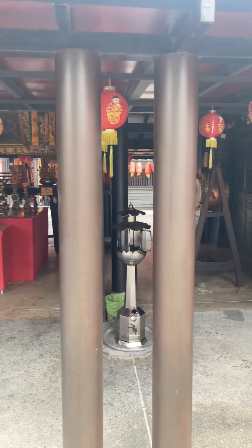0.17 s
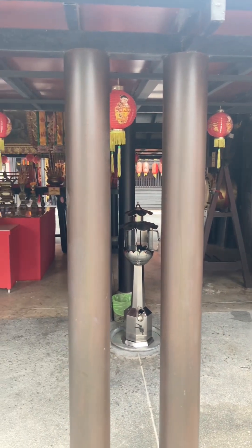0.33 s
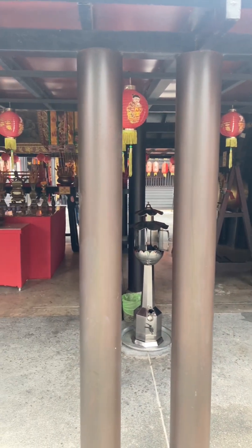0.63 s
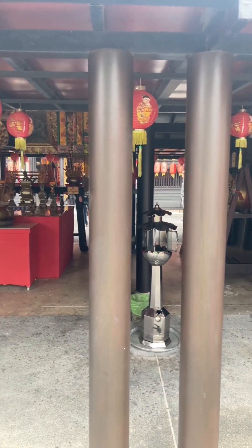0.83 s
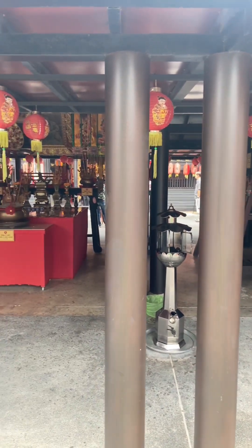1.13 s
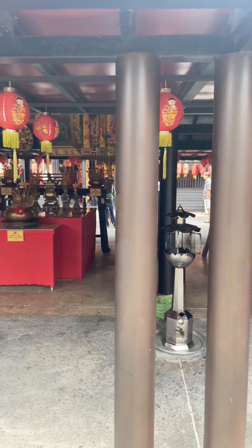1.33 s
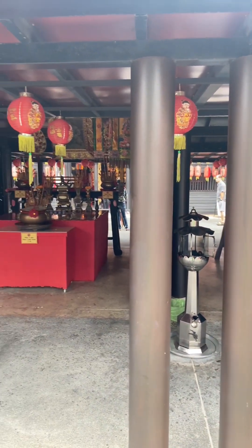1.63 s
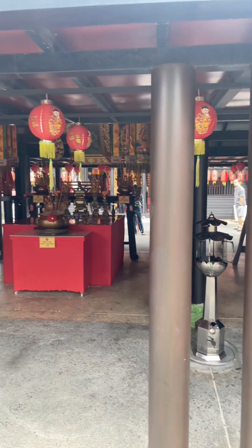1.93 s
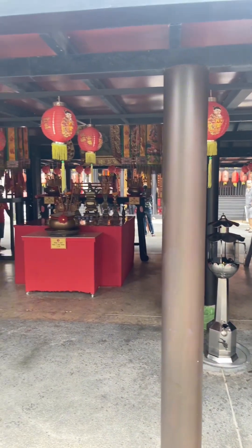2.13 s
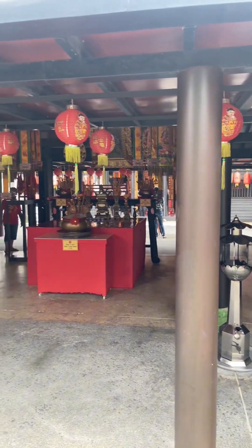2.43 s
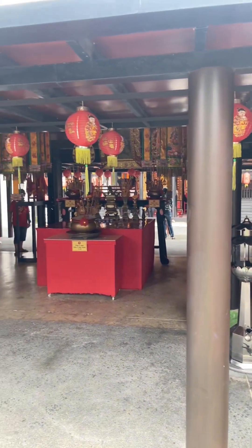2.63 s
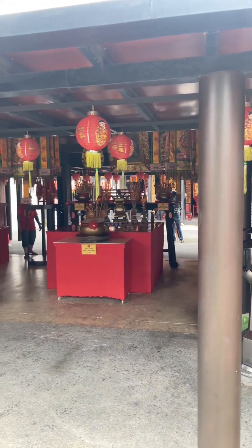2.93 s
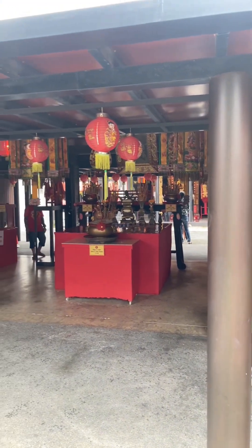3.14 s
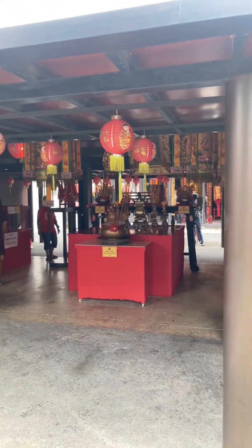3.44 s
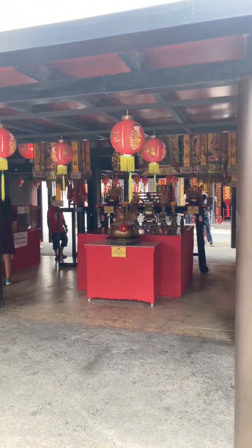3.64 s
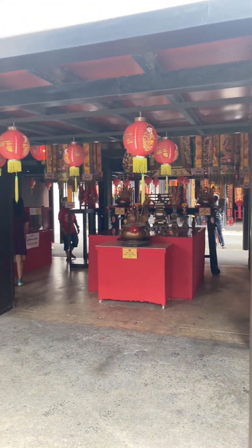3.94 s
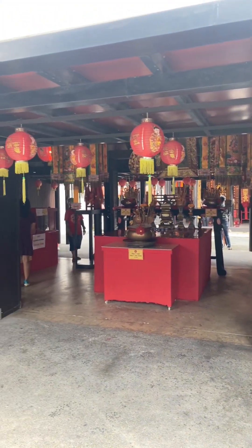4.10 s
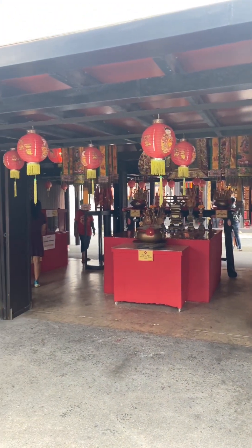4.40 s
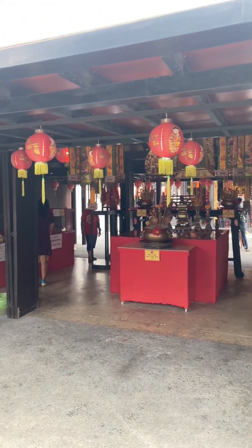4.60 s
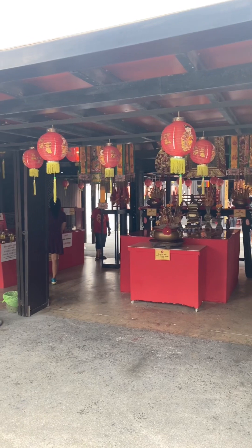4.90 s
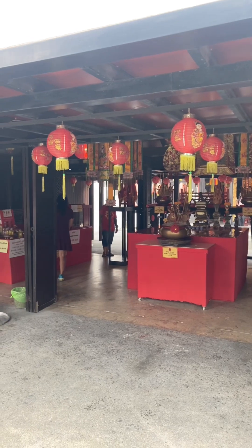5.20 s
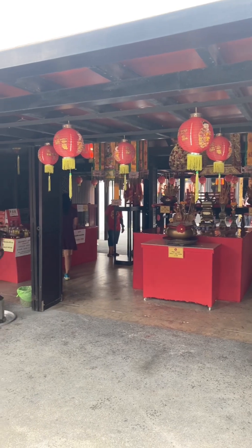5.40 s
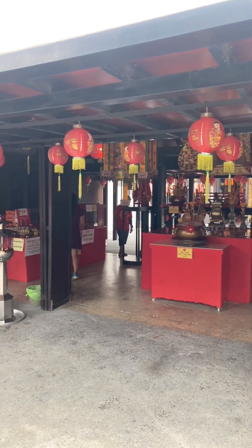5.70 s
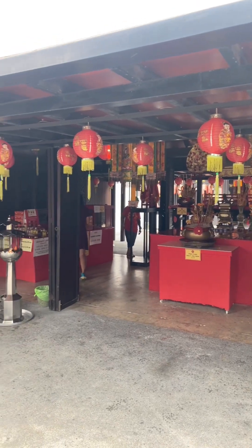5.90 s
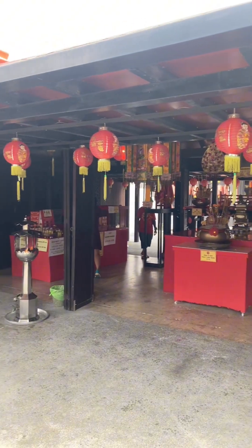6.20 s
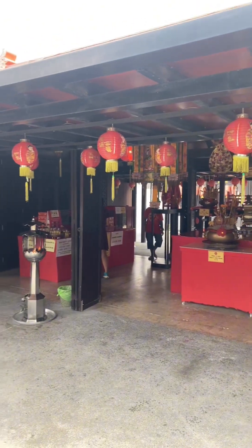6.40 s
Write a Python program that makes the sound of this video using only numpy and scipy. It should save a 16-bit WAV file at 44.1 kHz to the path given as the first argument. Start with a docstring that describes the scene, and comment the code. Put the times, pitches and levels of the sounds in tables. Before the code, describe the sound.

Deep, boomy thumps and dull knocks of fingers on a hand-held phone, over a low grip rumble, thin ticks and faint flickering hiss.

```python
"""Handling noise of a phone

A phone is carried by hand round a quiet covered courtyard. The grip rumbles as filtered noise.
Shifting fingers nudge, knock and creak on the case: each push is an impulse that the case filters
and disperses into a short falling thump, and knocks add a crack, a rattle and a faint high ring.
Gated noise hisses on and off, a few dry ticks stand out, and a limiter holds down the hardest thumps."""
import sys
import numpy as np
from scipy import signal
from scipy.fft import rfft, irfft, next_fast_len
from scipy.io import wavfile
from scipy.ndimage import uniform_filter1d, minimum_filter1d

SR = 44100
rng = np.random.default_rng(int(sys.argv[2]) if len(sys.argv) > 2 else 0)


def put_to_file(sound):
    """Save the sound as 16-bit audio at rate SR, in the file named by the first command-line argument."""
    columns = np.atleast_2d(sound).T  # one column per channel
    safe = np.clip(columns, -1, 1)
    whole_steps = np.round(safe * 32767)
    wavfile.write(sys.argv[1], SR, whole_steps.astype(np.int16))


N = 288855
TIME = np.arange(N) / SR  # s

# Knocks on the case. Each row: time in seconds, nominal thump peak in dB,
# contact sharpness in Hz, nominal crack peak in dB.
KNOCKS = [(0.327, -11.5, 101, -66), (0.451, -8.5, 159, -53), (0.504, -9, 208, -60),
          (0.788, -13, 205, -42.5), (1.057, 2, 344, -30.5), (1.116, -12, 90, -64), (1.298, -14, 168, -51),
          (1.625, -12, 114, -64), (1.729, -6.5, 207, -48), (1.823, -15.5, 204, -68),
          (1.985, -15.5, 390, -50), (2.007, -8, 240, -44), (2.043, 3, 500, -23), (2.222, -5.5, 150, -51),
          (2.562, -11.5, 175, -67), (2.625, -8.5, 142, -66), (2.839, -16.5, 313, -50.5),
          (2.978, -8.5, 124, -45), (3.188, -7.5, 90, -53), (3.351, -16.5, 144, -49.5),
          (3.417, -18.5, 280, -49), (3.476, -8, 160, -42.5), (3.717, -12.5, 246, -51.5),
          (3.851, -11.5, 131, -57), (3.957, -22.5, 270, -49), (4.491, -10, 314, -48), (4.504, -8, 170, -56),
          (4.543, -12.5, 363, -44), (4.565, -11.5, 180, -47), (4.586, -3, 194, -37.5),
          (4.713, -11, 157, -62), (4.784, -9.5, 115, -65), (4.945, -9, 280, -43), (5.079, -7.5, 125, -60),
          (5.12, 3, 390, -23), (5.311, -12.5, 189, -40.5), (5.344, 3.5, 420, -21), (5.437, -2, 209, -43),
          (5.452, -6.5, 227, -38), (5.494, 2.5, 537, -28.5), (5.576, 2.5, 450, -23.5),
          (5.955, -8, 169, -58), (5.995, 6, 490, -20), (6.241, -8, 183, -43), (6.259, -9, 400, -59),
          (6.426, -8, 225, -40.5), (6.469, -9.5, 129, -54), (6.521, -22, 420, -47)]
# Unrest of the hand. Each row: time in seconds, rumble in dB, creak in dB, both before trim and waver.
GRIP_UNREST = [(0.0, -26, -64), (1.07, -28.5, -63), (1.37, -27, -57), (1.75, -30, -55), (2.3, -27.5, -59),
               (3.92, -28, -63.5), (4.05, -30, -60), (5.04, -27, -58.5), (5.42, -22, -55.5),
               (5.97, -24, -61), (6.29, -27, -62), (6.55, -27, -53)]
# Dry ticks. Each row: time in seconds, nominal peak in dB.
TICKS = [(1.2188, -21.5), (2.5424, -25), (3.8656, -30), (5.1663, -29)]
# Stretches of hiss. Each row: start in seconds, end in seconds.
HISS_SPANS = [(0.324, 0.381), (0.438, 0.605), (0.72, 1.0), (1.027, 1.177), (1.326, 1.485), (1.571, 1.699),
              (1.748, 1.807), (1.993, 2.306), (2.624, 2.714), (2.969, 3.141), (3.191, 3.247), (3.4, 3.477),
              (3.835, 4.02), (4.138, 4.323), (4.387, 4.45), (4.493, 4.646), (4.68, 4.823), (4.899, 4.969),
              (5.116, 5.218), (5.34, 5.403), (5.439, 5.745), (5.861, 5.939), (5.992, 6.4), (6.453, 6.55)]
# A finger dragging over the case. Each row: start in seconds, end in seconds, level in dB before trims.
RUBS = [(0.463, 0.543, -42.5), (1.986, 2.04, -45), (4.477, 4.607, -42), (5.45, 5.515, -35),
        (6.244, 6.293, -38.5)]
# How the case passes a push to the microphone. Each row: frequency in Hz, relative gain in dB.
CASE_RESPONSE = [(15, -41), (30, -22), (50, -1.5), (68, 2), (100, -3), (140, -5), (200, -8.5), (280, -12),
                 (380, -13.5), (520, -20.5), (760, -26), (1000, -44.5), (3000, -75.5)]
# The crack and rattle of the case's joints. Each row: frequency in Hz, relative gain in dB.
JOINT_RESPONSE = [(250, -17), (480, 7), (800, 0), (1400, -4.5), (1950, -17.5), (2600, -21.5), (3600, -33),
                  (4600, -38.5), (7000, -51.5), (12000, -72)]
# The ring that comes with each crack. The one row: frequency in Hz, level in dB against the crack,
# time to decay by 60 dB in seconds.
RING = (11080, -43.5, 0.066)
# Colour of the hand's rumble. Each row: frequency in Hz, relative density in dB per Hz.
RUMBLE_COLOUR = [(10, -47.5), (22, -4), (43, -1), (65, 1), (100, -5.5), (150, -16.5), (200, -26.5),
                 (300, -38), (450, -56), (900, -80.5)]
# Colour of the courtyard's air. Each row: frequency in Hz, relative density in dB per Hz.
COURTYARD_COLOUR = [(100, 5), (300, -0.5), (450, 2.5), (700, -10.5), (1000, -13.5), (2000, -17),
                    (4000, -22.5), (7000, -24.5), (10000, -28.5), (13000, -38.5), (15000, -46.5)]
# Colour of the hiss. Each row: frequency in Hz, relative density in dB per Hz.
HISS_COLOUR = [(200, 11), (1000, 0.5), (2000, -0.5), (4000, -2.5), (7000, -4.5), (10000, -8),
               (13000, -12.5), (15000, -20.5)]

COURTYARD_DB, HISS_DB = -61, -59  # rms levels, before the swell and within the open gate
LAG_CYCLES = 1.5  # delay of a push through the case, in cycles of each frequency
CHATTER_DB = -1  # cluster of extra contacts against the main push
FIRMNESS_POWER = 5  # how fast a crack brightens with contact sharpness
CEILING_DB, TOP_HZ = -3.6, 15300  # limiter ceiling and upper band edge


def undb(db):
    """Decibels express the logarithm of an amplitude ratio; this inverts them to gain."""
    return 10 ** (np.asarray(db) / 20)


def unit(x):
    """Dividing a signal by its root mean square gives it rms 1."""
    return x / np.sqrt(np.mean(x ** 2))


def bins(size):
    """A real transform has evenly spaced frequencies; zero is raised to 1 Hz for the logarithm."""
    return np.maximum(np.fft.rfftfreq(size, 1 / SR), 1)


def colour(points, hz):
    """A spectrum is interpolated in dB along a logarithmic frequency axis, and returned as gain."""
    point_hz, db = np.transpose(points)
    return undb(np.interp(np.log(hz), np.log(point_hz), db))


def noise(points):
    """Spectral shaping of white noise gives a steady random sound of the given colour, rms 1."""
    size = next_fast_len(N, real=True)
    white = rng.standard_normal(size)
    shaped = irfft(rfft(white) * colour(points, bins(size)), size)
    return unit(shaped[:N])


def walk(rate):
    """Random levels, each held 1 / rate seconds and smoothed twice, make a slow drift of rms 1."""
    hold = int(SR / rate)
    steps = np.repeat(rng.standard_normal(N // hold + 1), hold)
    smooth = uniform_filter1d(uniform_filter1d(steps, hold), hold)
    return unit(smooth[:N])


def add(out, sound, start):
    """Superposition: a sound is summed into the mix from its start time in seconds."""
    first = int(round(start * SR))
    a, b = max(first, 0), min(first + len(sound), N)
    out[a:b] += sound[a - first:b - first]


def gate(start, end, edge_s):
    """A linear gate is 1 between two times, with short ramps at its ends."""
    return np.clip(np.minimum(TIME - start, end - TIME) / edge_s + .5, 0, 1)


def through_case(force, points, sharp_hz):
    """Dispersion delays low frequencies most, and a soft contact low-passes the push."""
    size = next_fast_len(len(force), real=True)
    hz = bins(size)
    softness = 1 + (hz / max(sharp_hz, 20)) ** 4
    gain = colour(points, hz) / softness
    # every frequency arrives the same number of cycles late, so the pulse sweeps downwards
    lag = np.exp(-2j * np.pi * LAG_CYCLES * np.log(hz / 1130))
    # dividing by the mean gain would give an undispersed unit push a peak near 1
    pulse = irfft(rfft(force, size) * gain / gain.mean() * lag, size)
    return pulse[:len(force)]


def stick_slip(per_s, scatter_db):
    """Stick-slip friction: skin catches and lets go as randomly timed pushes of uneven size and sign."""
    steps = (rng.random(N) < per_s / SR) * rng.choice([-1, 1], N)
    unevenness = np.minimum(rng.exponential(size=N), 2)
    return steps * undb(scatter_db * unevenness)


def slips(spread_s, count, size):
    """Multiple contact: small uneven pushes cluster round the middle of a buffer, scaled to norm 1."""
    force = np.zeros(size)
    offset, strength = rng.standard_normal((2, count))
    place = np.clip(size // 2 + offset * spread_s * SR, 0, size - 1).astype(int)
    force[place] = strength
    return force / np.linalg.norm(force)


def courtyard(swell_db=0.44):
    """Distant outdoor air is a diffuse broadband noise, here barely swelling."""
    return noise(COURTYARD_COLOUR) * undb(COURTYARD_DB + swell_db * walk(3))


def grip(rumble_db=2, creak_db=2, slips_per_s=30, scatter_db=4, creak_hz=330,
         waver_db=1, waver_per_s=8, clench_db=3):
    """Muscle tremor rumbles as low noise while skin creaks by stick-slip; both waver with the hold."""
    s, *columns = np.transpose(GRIP_UNREST)
    tremor, creak = (undb(np.interp(TIME, s, column)) for column in columns)
    creaking = unit(through_case(stick_slip(slips_per_s, scatter_db), CASE_RESPONSE, creak_hz))
    rumble, hold = noise(RUMBLE_COLOUR), walk(waver_per_s)
    rumbling = rumble * tremor * undb(rumble_db + waver_db * hold)
    return rumbling + creaking * creak * undb(creak_db + clench_db * hold)


def nudges(nudge_db=-20, per_s=4, scatter_db=2, soft_hz=135):
    """Compliant finger pads press and let go at random, and their soft contact gives dull bumps."""
    force = stick_slip(per_s, scatter_db)
    return undb(nudge_db) * through_case(force, CASE_RESPONSE, soft_hz)


def hiss():
    """Broadband noise under a gate of steep ramps: a faint even hiss that starts and stops abruptly."""
    on = sum(gate(a, b, edge_s=0.0019) for a, b in HISS_SPANS)
    return on * noise(HISS_COLOUR) * undb(HISS_DB)


def knocks(slip_db=-11, slip_spread_s=0.002097, chatter_spread_s=.0012, soft_hz=700, hard_hz=6000,
           firm_hz=420, rattle_db=-6, rattle_t60=0.087, rattle_hz=1200, size=16384):
    """An impulse excites the case: a push among small slips thumps, and the joints crack, rattle and ring."""
    out, t = np.zeros(N), np.arange(size) / SR
    push = signal.unit_impulse(size, "mid")
    ring_hz, ring_db, ring_t60 = RING
    ring = undb(ring_db) * np.sin(2 * np.pi * ring_hz * t) * np.exp(-np.log(1000) * t / ring_t60)
    rattle_decay = np.exp(-np.log(1000) * t / rattle_t60)
    for s, thump_db, sharp_hz, crack_db in KNOCKS:
        # slips spring back 1 ms later, so they colour the middle of the thump and spare its bass
        skin = slips(slip_spread_s, count=4, size=size)
        skin = skin - np.roll(skin, int(SR / 1000))
        thump = through_case(push + undb(slip_db) * skin, CASE_RESPONSE, sharp_hz)
        # a few contacts within milliseconds give each crack its own hollow colour
        chatter = slips(chatter_spread_s, count=4, size=size)
        # a soft touch gives a dull tock, a firm one a bright snap
        crack_hz = soft_hz + hard_hz * (sharp_hz / firm_hz) ** FIRMNESS_POWER
        crack = through_case(push + undb(CHATTER_DB) * chatter, JOINT_RESPONSE, crack_hz)
        crack = crack / np.abs(crack).max()
        # the rattle is decaying noise that begins with the push
        shake = np.roll(rng.standard_normal(size) * rattle_decay, size // 2)
        shake = shake / np.linalg.norm(shake)
        rattle = undb(rattle_db) * through_case(shake, JOINT_RESPONSE, rattle_hz)
        knock = undb(thump_db) * thump + undb(crack_db) * (crack + rattle)
        add(out, knock, s - size / 2 / SR)
        add(out, undb(crack_db) * ring, s)
    return out


def rubs(slips_per_s=150, scatter_db=4, rub_hz=550, body_db=2, scratch_db=-21, scratch_hz=1400):
    """Rapid stick-slip under a dragging finger shakes the case and scratches at its joints."""
    force = stick_slip(slips_per_s, scatter_db)
    body = undb(body_db) * unit(through_case(force, CASE_RESPONSE, rub_hz))
    scratch = undb(scratch_db) * unit(through_case(force, JOINT_RESPONSE, scratch_hz))
    drag = sum(undb(db) * gate(a, b, edge_s=0.012) for a, b, db in RUBS)
    return (body + scratch) * drag


def ticks():
    """A pulse of a few samples has a broad spectrum: a thin dry tick with no ring."""
    out = np.zeros(N)
    for s, db in TICKS:
        add(out, undb(db) * signal.windows.hann(6), s)
    return out


def scene():
    """Superposition of the handling sounds and the quiet background, in one channel."""
    return (knocks() + nudges() + rubs() + ticks() + hiss() + courtyard() + grip())[None]


def record(dry, reach_s=0.00081):
    """Peak limiting lowers the gain just ahead of each peak; a steep low-pass then cuts the top."""
    span = max(int(reach_s * SR), 2)
    allowed = np.minimum(1, undb(CEILING_DB) / (np.abs(dry) + 1e-9))
    lowest = minimum_filter1d(allowed, 2 * span)
    gain = uniform_filter1d(uniform_filter1d(lowest, span), span)
    # order 8, ripple .2 dB, stopband 70 dB down
    low_pass = signal.ellip(8, .2, 70, TOP_HZ, fs=SR, output="sos")
    return signal.sosfilt(low_pass, dry * gain)


dry = scene()
out = record(dry)
put_to_file(out)
```